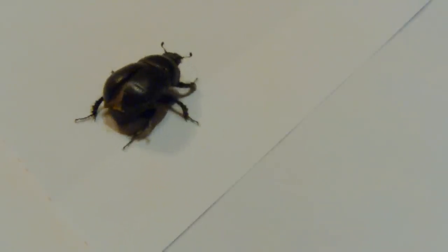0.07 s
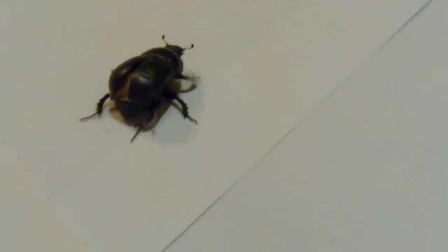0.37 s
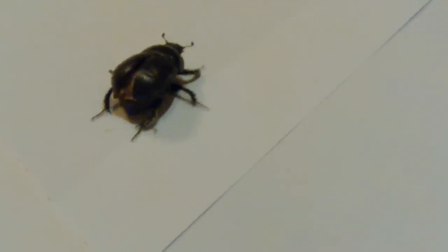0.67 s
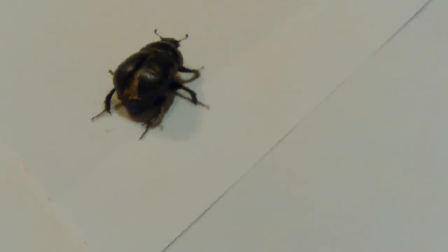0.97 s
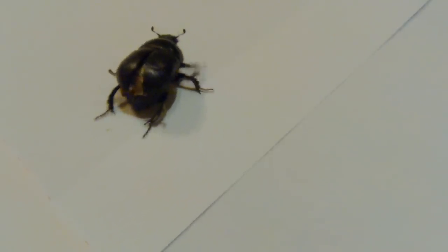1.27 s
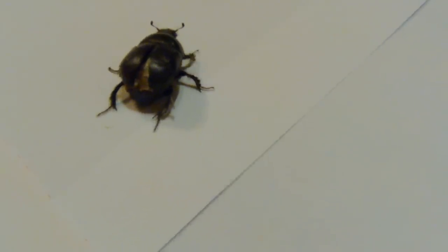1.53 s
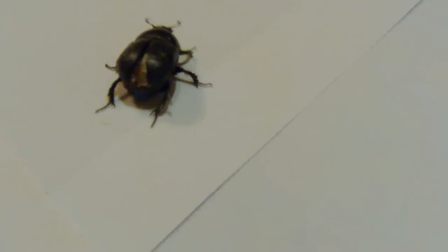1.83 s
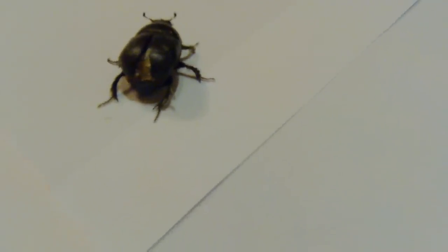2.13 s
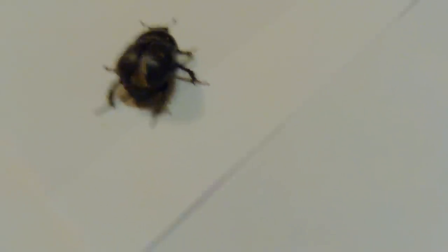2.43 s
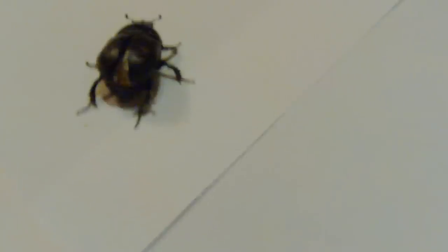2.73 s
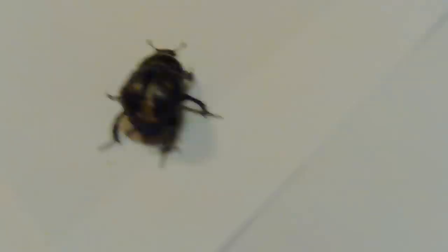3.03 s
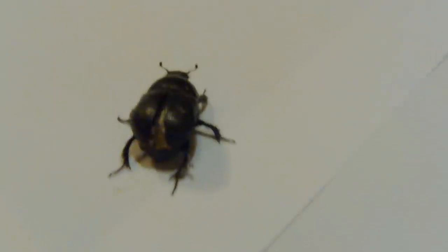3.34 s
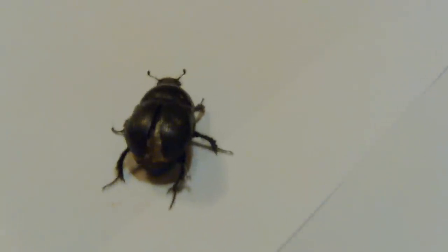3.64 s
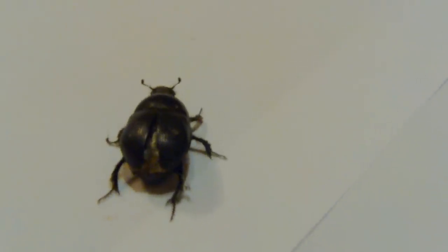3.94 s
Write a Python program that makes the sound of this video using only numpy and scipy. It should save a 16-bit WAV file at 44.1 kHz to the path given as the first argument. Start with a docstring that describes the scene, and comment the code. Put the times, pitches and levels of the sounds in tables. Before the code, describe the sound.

A beetle's claws faintly tick, tap and rasp on a smooth sheet in a small room. Midway the nearby hand-held camera clicks, then clicks much louder and rubs softly. The ticking goes on over microphone hiss until a last knock.

```python
"""A beetle claws at a smooth sheet near a hand-held camera: its claws tick, tap and rasp as they slip.
A faint hum comes and goes, and a thin whistle arches high up. Near 2 s the camera's plastic case clicks
and is knocked. A much louder click follows, turned down by a limiter; it leaves a thin ring and a soft
rubbing hiss. The beetle ticks on, a second whistle arches, and a last knock comes at the end.
All along, a small room echoes, and room air and microphone hiss lie underneath."""
import sys
import numpy as np
from scipy import signal
from scipy.fft import rfft, irfft, next_fast_len
from scipy.io import wavfile
from scipy.ndimage import uniform_filter1d, minimum_filter1d, map_coordinates

SR = 44100
rng = np.random.default_rng(int(sys.argv[2]) if len(sys.argv) > 2 else 0)


def to_wav(sig):
    """Store sig (one row per channel, or 1-D mono) as 16-bit WAV at the path in sys.argv[1].

    Samples outside -1..1 are clipped; the rate is SR.
    """
    pcm = np.clip(np.atleast_2d(sig), -1, 1) * 32767
    pcm = np.round(pcm).astype(np.int16)
    wavfile.write(sys.argv[1], SR, pcm.T)  # frames by channels


N = 176400

# Clicks of the camera's case. Each row: start in seconds, level in dB, treble tilt in dB per octave,
# how many times longer the case rings, level of the camera's body in dB.
CASE_CLICKS = [(1.9778, -23.5, 0.5, 1.45, -49.5), (2.6597, -6.5, 0, 1.45, -42.5)]
# The tones of the camera's body. Each row: pitch in Hz, relative level in dB,
# seconds to fade by 60 dB (called t60) before any stretch.
BODY_TONES = [(426, -8.5, 0.055), (547, -1.5, 0.031), (740, 4, 0.018), (939, 5.5, 0.027), (1390, 2, 0.038),
              (2043, 3, 0.031), (2246, -3.5, 0.042), (2847, 0.5, 0.028)]
# How alike close sounds are left and right. Each row: frequency in Hz, likeness (1 is the same).
NEAR_LIKENESS = [(300, 0.28), (3000, 0.86), (12000, 0.85)]


def claw_ticks():
    """A claw catches on the sheet: a tiny crack with one broad ring of the claw."""
    # Each row: start in seconds, level in dB, pitch of the ring in Hz.
    ticks = [(0.0789, -38.5, 10300), (.1453, -41, 10400), (.1608, -36, 7650), (.1803, -45, 9500),
             (0.1877, -33, 9700), (0.3576, -35.5, 11600), (0.3666, -39, 11100), (.4676, -37, 11300),
             (0.6788, -43.5, 10900), (.6982, -41, 9500), (0.7027, -45, 11000), (0.8525, -37, 11500),
             (1.038, -36, 11600), (1.041, -36, 11800), (1.069, -35.5, 11100), (1.096, -41, 9100),
             (1.1868, -39, 12000), (1.2049, -31.5, 11600), (1.3961, -37, 12000), (1.5327, -40.5, 10900),
             (1.6908, -40, 10000), (2.039, -44, 10800), (2.199, -38, 11500), (2.2052, -44, 12000),
             (2.211, -42, 11500), (2.2373, -31.5, 12100), (2.2467, -36, 10400), (2.3886, -36.5, 10500),
             (3.201, -37.5, 8600), (3.214, -47, 11000), (3.7325, -45, 12100), (3.7428, -43, 12000),
             (3.7587, -43, 11000), (3.915, -38, 11500), (3.9868, -39, 8500)]
    # The crack's colour, its balance of low and high. Each row: frequency in Hz, relative level in dB.
    tick_colour = [(60, -15), (300, -16), (1500, -18), (3000, -16), (4000, 0.5), (5000, -2.5), (7000, 1.5),
                   (12500, 3), (15500, -10)]
    ring_db, ring_width_hz = 10, 2200
    out = np.zeros((2, N))
    for start, db, hz in ticks:
        claw_ring = lambda f: 1 + amp(ring_db) * abs(resonance(f, hz, ring_width_hz))
        response = lambda f: gains(tick_colour, f) * claw_ring(f)
        add(out, start, amp(db) * burst(response, t60=0.003, rise_s=0.0001))
    return out


def foot_taps():
    """A foot taps the sheet, which rings briefly at a pitch that depends on the spot."""
    # Each row: start in seconds, level in dB, pitch in Hz.
    taps = [(.1605, -47, 3950), (.5368, -56, 4020), (.679, -52, 4020), (.7235, -49, 4070),
            (.899, -50.5, 3220), (1.187, -49, 3990), (1.329, -51, 4220), (3.1005, -49, 3440)]
    out = np.zeros((2, N))
    for start, db, hz in taps:
        add(out, start, ring([(hz, db, 0.0129)], rise_s=0.00029))  # fades by 60 dB in about 13 ms
    return out


def leg_slips():
    """A slipping leg rasps in many tiny catches and rings the sheet; the other feet tick faintly."""
    # Each row: start in seconds, length in seconds, rasp level in dB, sheet level in dB.
    slips = [(0, 0.032, -60.5, -66.5), (0.078, 0.056, -63.5, -72), (.14, 0.033, -55.5, -65),
             (0.183, 0.017, -53.5, -71), (0.351, 0.025, -55.5, -78), (0.673, 0.11, -61, -73),
             (0.812, 0.038, -61, -60.5), (0.843, 0.066, -62.5, -75), (1.006, 0.11, -66, -77),
             (1.289, 0.04, -62.5, -67), (1.354, 0.079, -65, -75), (1.463, 0.017, -59.5, -71),
             (1.685, 0.033, -64, -79), (2.195, 0.021, -57.5, -92), (2.224, 0.023, -63, -92),
             (2.275, 0.142, -66, -84), (3.737, 0.061, -64.5, -74)]
    # The rasp's colour. Each row: frequency in Hz, relative level in dB.
    rasp_colour = [(60, -48), (500, -34), (2500, -10.5), (5000, -9.5), (6500, -2), (8000, -2.5),
                   (9500, -0.5), (10400, -3.5), (11700, 1.5), (14000, -4.5), (15500, -11)]
    rasp_response = lambda f: gains(rasp_colour, f)
    rasp = grains(rasp_response, per_s=1800, spread_db=2.5)
    sheet = grains(lambda f: resonance(f, hz=3950, width_hz=440), per_s=1800, spread_db=2.5)
    out = amp(-71.5) * grains(rasp_response, per_s=250, spread_db=5.5)  # the other feet
    for start, length, rasp_db, sheet_db in slips:
        out += fade_in_out(start, length) * (amp(rasp_db) * rasp + amp(sheet_db) * sheet)
    return out


def case_clicks():
    """Hard plastic cracks; case and body ring. Returns the clicks and the pulses they send the room."""
    # The case's tones. Each row: pitch in Hz, relative level in dB, t60 in seconds before the stretch.
    case_tones = [(250, -48, .06), (1450, -20.5, .014), (1680, -22, .01), (3420, -11, .007),
                  (4180, -5, .005), (4600, -3.5, .005), (5250, -11, .005), (8050, -14, .011),
                  (8500, -6, .005), (9900, -9, .005), (11550, 3, .004), (13200, -3, .0045),
                  (14400, -10, .004)]
    # The colours of the crack and the pulse. Each row: frequency in Hz, relative level in dB.
    crack_colour = [(200, -41), (1100, -19.5), (1500, 1), (2600, -11), (4400, 8), (6200, -7), (8500, 2),
                    (11500, 3), (13300, 5), (15500, -2.5)]
    pulse_colour = [(100, -36), (1000, -7), (3200, -10), (4300, 5.5), (5000, 0.5), (6100, -7.5),
                    (7200, 3.5), (7900, -2), (8600, 4.5), (10400, 1), (12400, 2), (13300, -6), (15000, -3)]
    crack_db, pulse_db, rise_s = -6, 8.5, 0.00055
    clicks, pulses = np.zeros((2, 2, N))
    for start, db, tilt_db, stretch, body_db in CASE_CLICKS:
        add(clicks, start, amp(db) * ring(case_tones, rise_s, tilt_db, stretch))
        add(clicks, start, amp(body_db) * ring(BODY_TONES, rise_s=0.0022))
        crack = burst(lambda f: gains(crack_colour, f), t60=0.0085 * stretch, rise_s=rise_s)
        add(clicks, start, amp(db + crack_db) * crack)
        add(pulses, start, amp(db + pulse_db) * np.ones((2, 1)))
    return clicks, filtered(pulses, lambda f: gains(pulse_colour, f))


def after_ring():
    """A thin ring lingers after the loudest click."""
    # Each row: pitch in Hz, level in dB, t60 in seconds.
    lingering_tones = [(4300, -54, 0.49)]
    loudest_start = max(CASE_CLICKS, key=lambda row: row[1])[0]
    age = np.arange(N) / SR - loudest_start
    return sum((age > 0) * amp(db - 60 * abs(age) / t60) * fuzzy_tone(hz, width_hz=380)
               for hz, db, t60 in lingering_tones)


def case_knocks():
    """Softer knocks on the case: a snap with less treble, and the lower ring of the body."""
    # Each row: start in seconds, snap level in dB, snap's upper edge in Hz, body level in dB,
    # body's treble tilt in dB per octave.
    knocks = [(2.0615, -41.5, 14300, -47.5, -2.5), (3.9328, -22.5, 9700, -43.5, 5.5)]
    # The snap's colour. Each row: frequency in Hz, relative level in dB.
    snap_colour = [(80, -41), (300, -32), (1100, -19), (2000, -3.5), (2550, -5.5), (3200, 2), (4800, -5),
                   (5900, 2.5), (8500, 1.5), (11000, -1), (15500, 1)]
    out = np.zeros((2, N))
    for start, snap_db, edge_hz, body_db, tilt_db in knocks:
        treble_cut = lambda f: amp(-16) + 1 / (1 + (f / edge_hz) ** 20)
        snap = burst(lambda f: gains(snap_colour, f) * treble_cut(f), t60=0.014, rise_s=0.0001)
        add(out, start, amp(snap_db) * snap)
        add(out, start, amp(body_db) * ring(BODY_TONES, rise_s=0.002, tilt_db=tilt_db, stretch=0.98))
    return out


def grip():
    """The grip on the camera shifts: faint low bumps, and a rubbing hiss that briefly sings."""
    # How loud the rubbing is. Each row: time in seconds, level in dB.
    rub_levels = [(2.7, -52), (2.82, -61), (2.96, -60), (3.25, -61), (3.36, -65.5), (3.7, -68.5),
                  (3.9, -65.5)]
    # The bumps. Each row: start in seconds, length in seconds, level in dB.
    bumps = [(1.952, 0.25, -78.5), (2.256, .12, -78), (2.566, 0.062, -75)]
    # The colours of rubbing and bumps. Each row: frequency in Hz, relative level in dB.
    rub_colour = [(150, -44), (800, -33.5), (2500, -4.5), (5200, -2), (6900, 0.5), (8000, -4), (10800, 1),
                  (13000, -5), (15500, -4.5)]
    bump_colour = [(25, -35), (90, 4.5), (130, -7), (250, 2.5), (500, 7), (1200, -30)]
    sing_peak_s, sing_spread_s = 2.93, 0.12
    t = np.arange(N) / SR
    times, rub_db = np.transpose(rub_levels)
    rub = np.interp(t, times, amp(rub_db), left=0, right=0) * noise(rub_colour)
    sing_level = amp(-66.5) / (1 + ((t - sing_peak_s) / sing_spread_s) ** 2)
    sing = sing_level * fuzzy_tone(5940, width_hz=950)  # the rubbing gathers in one resonance
    bump_level = sum(amp(db) * fade_in_out(start, length) for start, length, db in bumps)
    return rub + sing + bump_level * noise(bump_colour)


def whistles():
    """Faint high whistles, each made of three hissy, fluttering tones that rise and fall together."""
    # Each row: start in seconds, length in seconds, top pitch in Hz, drop at the ends in Hz, level in dB.
    arches = [(.95, .31, 10900, 2300, -76.5), (3.36, .4, 11770, 1200, -72.5)]
    # The tones in a whistle. Each row: pitch ratio, relative level in dB.
    parts = [(1, 1), (.92, 0.5), (.87, -1)]
    out = np.zeros(N)
    for start, length, top_hz, drop_hz, db in arches:
        from_middle = np.clip(2 * (np.arange(N) / SR - start) / length - 1, -1, 1)
        pitch = top_hz - drop_hz * from_middle ** 2
        for ratio, part_db in parts:
            flutter_db = 2.5 * wobble(per_s=26)
            level = fade_in_out(start, length) * amp(db + part_db + flutter_db)
            out += level * fuzzy_tone(ratio * pitch, width_hz=700)
    return out


def hum():
    """A faint low hum comes and goes once."""
    return amp(-89) * fade_in_out(start=0.68, length=0.875) * fuzzy_tone(226, width_hz=14)


def room_echo(sound):
    """A small room answers with a smooth echo that builds up after a short gap."""
    # How long the echo lasts. Each row: frequency in Hz, t60 in seconds.
    fade_times = [(200, 0.3), (1500, 0.17), (5000, 0.28), (14000, 0.33)]
    gap_s, build_s = 0.009, 0.0021
    hz, t, spectrum = signal.stft(rng.standard_normal((2, SR // 2)), SR, nperseg=256)
    swell = 1 - np.exp(-(t + t[1]) / build_s)
    fade = amp(-60 * t / look_up(fade_times, hz)[:, None])
    tail = signal.istft(spectrum * swell * fade, SR, nperseg=256)[1]
    tail = np.pad(tail / np.linalg.norm(tail[0]), ((0, 0), (round(gap_s * SR), 0)))
    return signal.fftconvolve(sound, tail, axes=1)[:, :N]


def room_air():
    """Steady room air and microphone hiss."""
    # The air's colour. Each row: frequency in Hz, relative level in dB.
    air_colour = [(35, -75), (120, -33), (180, -27), (235, -15), (300, -14.5), (410, -9.5), (540, -7),
                  (960, -3), (1850, -5.5), (2740, -6.5), (5000, -8.5), (9600, -11), (14000, -10),
                  (15200, -8.5)]
    # How alike left and right are. Each row: frequency in Hz, likeness (1 is the same).
    air_likeness = [(100, 0.28), (500, 0.28), (1200, 0.24), (3000, 0.083), (12000, 0.18)]
    return amp(-60) * noise(air_colour, air_likeness)


def burst(response, t60, rise_s):
    """A crack: noise that rises fast and dies away, shaped by a filter."""
    t = np.arange(SR // 20) / SR
    shape = amp(-60 * t / t60) * (1 - np.exp(-t / rise_s))
    crack = stereo(shape * rng.standard_normal((2, len(t))), lambda f: causal(response(f)))
    return crack * np.sqrt(np.mean(shape ** 2))


def ring(tones, rise_s, tilt_db=0, stretch=1):
    """The fading tones of a struck thing; each reaches the two microphones a little out of step."""
    t = np.arange(SR // 8) / SR
    hz, db, t60 = np.transpose(tones)[..., None]
    phase = 2 * np.pi * hz * t + rng.uniform(0, 2 * np.pi, hz.shape)
    lag = rng.choice([-1, 1], hz.shape) * np.arctan(amp(-10.5))
    octaves = np.log2(hz / np.median(hz))
    fade = amp(db + tilt_db * octaves - 60 * t / (t60 * stretch))
    rise = 1 - np.exp(-t / rise_s)
    return rise * np.array([(fade * np.sin(phase + side * lag)).sum(0) for side in (1, -1)])


def grains(response, per_s, spread_db):
    """Tiny ticks at random moments and of uneven size."""
    sizes = amp(spread_db * np.minimum(rng.exponential(size=N), 4))
    hits = rng.random(N) < per_s / SR
    return stereo(hits * sizes * rng.choice([-1, 1], (2, N)), response)


def fuzzy_tone(hz, width_hz):
    """A narrow band of noise around a steady or moving pitch."""
    a, b = filtered(rng.standard_normal((2, N)), lambda f: 1 / (1 + (2 * f / width_hz) ** 4))
    phase = 2 * np.pi * np.cumsum(hz * np.ones(N)) / SR
    return unit(a * np.cos(phase) + b * np.sin(phase))


def noise(colour, likeness=NEAR_LIKENESS):
    """Steady stereo noise of the given colour."""
    return stereo(rng.standard_normal((2, N)), lambda f: gains(colour, f), likeness)


def stereo(pair, response, likeness=NEAR_LIKENESS):
    """Filter two unrelated signals and blend them into a partly alike left and right, at level 1."""
    def blend(f):
        angle = np.arccos(np.clip(look_up(likeness, f), -1, 1)) / 2
        return np.array([np.cos(angle), np.sin(angle)])
    mid, side = filtered(pair, lambda f: response(f) * blend(f))
    return unit(np.array([mid + side, mid - side]))


def fade_in_out(start, length):
    """A level that rises, holds at 1 and falls; times are in seconds."""
    edge_share = 0.089
    progress = (np.arange(N) / SR - start) / length
    return np.clip(np.minimum(progress, 1 - progress) / edge_share, 0, 1)


def wobble(per_s):
    """A smooth curve through so many random points a second."""
    points = rng.standard_normal(int(N * per_s / SR) + 4)
    return map_coordinates(points, [np.arange(N) * per_s / SR])


def filtered(sound, response):
    """Multiply each frequency f in a sound by response(f)."""
    n = sound.shape[-1]
    padded = next_fast_len(n + 4096)
    return irfft(rfft(sound, padded) * response(np.fft.rfftfreq(padded, 1 / SR)), padded)[..., :n]


def resonance(f, hz, width_hz):
    """The response of something that rings at one pitch."""
    return 1j * f * width_hz / (hz * hz - f * f + 1j * f * width_hz)


def causal(gain):
    """A response with these gains that sounds only after it is struck."""
    log_echo = irfft(np.log(np.maximum(gain, 1e-6)))
    k = np.arange(len(log_echo))
    forward_only = np.where(k == 0, 1, 2 * (k < len(k) // 2))
    return np.exp(rfft(log_echo * forward_only))


def gains(colour, hz):
    """A colour table's gain at each frequency."""
    return amp(look_up(colour, hz))


def look_up(table, hz):
    """Read between rows of frequency and value, on a scale of octaves."""
    row_hz, values = np.transpose(table)
    return np.interp(np.log(hz + 1), np.log(row_hz + 1), values)


def amp(db):
    """Turn decibels into a gain."""
    return 10 ** (np.asarray(db) / 20)


def unit(sound):
    """Scale a sound to an average (rms) level of 1."""
    return sound / np.sqrt(np.mean(sound ** 2) + 1e-20)


def add(out, start, sound):
    """Mix a sound in at start seconds."""
    part = out[:, max(round(start * SR), 0):][:, :sound.shape[1]]
    part += sound[:, :part.shape[1]]


def scene():
    """The beetle and the handled camera in the room, over its air."""
    clicks, pulses = case_clicks()
    legs = claw_ticks() + foot_taps() + leg_slips()
    knocks = case_knocks()
    # Legs stir the room less than clicks do, and the soft knocks least.
    echo = amp(-9) * room_echo(pulses + amp(-2.5) * legs + amp(-4.5) * knocks)
    return legs + knocks + clicks + after_ring() + echo + grip() + whistles() + hum() + room_air()


def record(dry):
    """A limiter turns peaks down at once, holds and recovers steadily; the highest treble is cut off."""
    ceiling_db, hold_s, release_db_per_s, top_hz = -8.5, 0.026, 182, 15450
    over_db = np.maximum(20 * np.log10(abs(dry).max(0) + 1e-9) - ceiling_db, 0)
    hold_samples = 2 * round(hold_s * SR / 2) + 1
    held_db = -minimum_filter1d(-over_db, hold_samples, origin=hold_samples // 2)
    recovery_db = release_db_per_s * np.arange(N) / SR
    cut_db = uniform_filter1d(np.maximum.accumulate(held_db + recovery_db) - recovery_db, size=8)
    return filtered(dry * amp(-cut_db), lambda f: 1 / (1 + (f / top_hz) ** 150))


dry = scene()
out = record(dry)
to_wav(out)
```